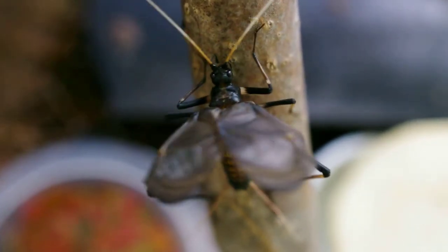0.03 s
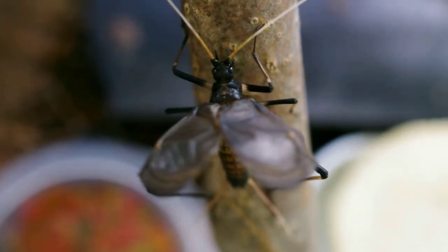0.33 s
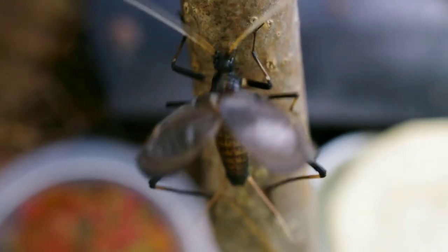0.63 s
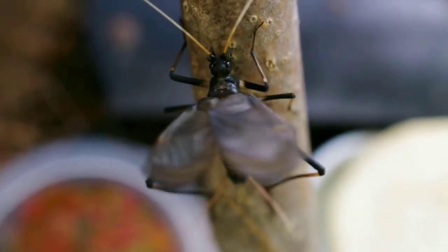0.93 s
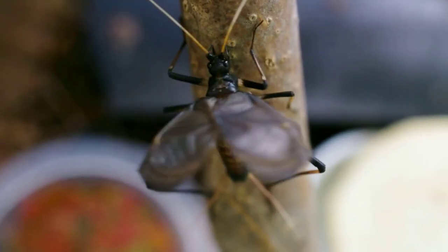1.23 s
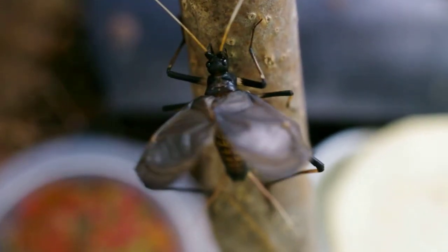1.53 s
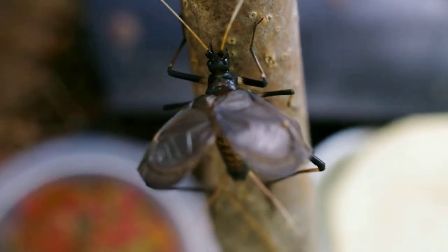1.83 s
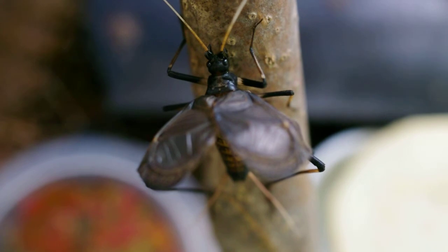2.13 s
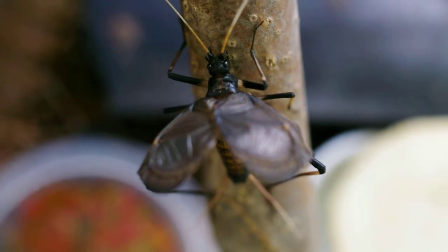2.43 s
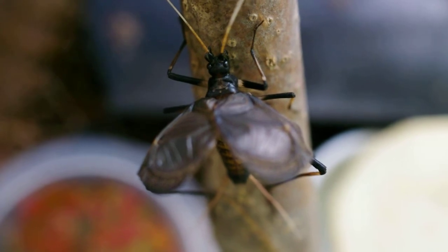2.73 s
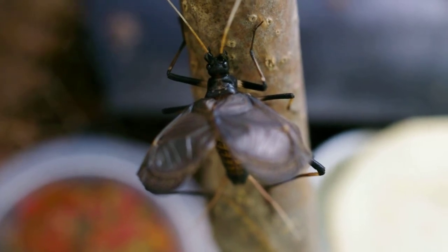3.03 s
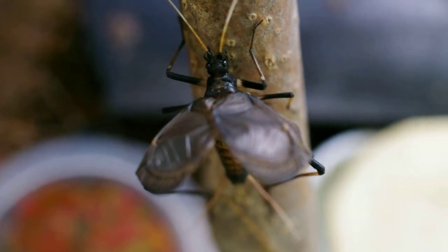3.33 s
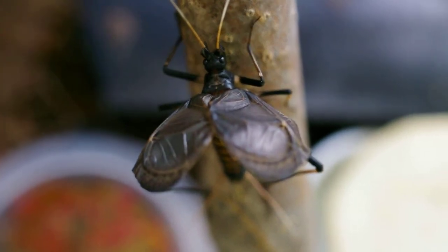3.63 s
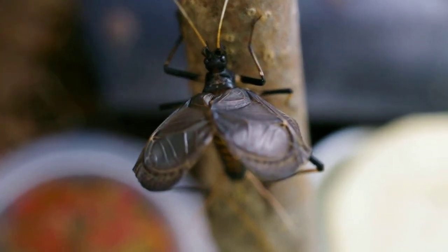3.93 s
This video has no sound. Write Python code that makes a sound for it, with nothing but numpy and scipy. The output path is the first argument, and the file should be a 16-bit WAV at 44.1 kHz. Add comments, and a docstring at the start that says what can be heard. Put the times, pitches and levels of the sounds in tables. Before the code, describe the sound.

A cricket trills close by indoors, while a fainter, higher cricket calls from farther off.

```python
"""A bell cricket trills close by, indoors; a second one, a little higher, joins from farther off.
Each wing stroke drags a scraper over a file: the wing rings near 5 kHz with faint overtones
and a dry rasp. The near one stops first; the far one slows, its strokes break in two,
and only the room's steady rush is left."""
import sys
import numpy as np
from scipy import signal
from scipy.fft import rfft, irfft
from scipy.io import wavfile

SR = 44100
rng = np.random.default_rng(int(sys.argv[2]) if len(sys.argv) > 2 else 0)


def output_pcm(signal):
    """Save a mono or channel-first signal as 16-bit PCM at the path in sys.argv[1].

    Samples are clipped to [-1, 1] before scaling.
    """
    pcm = np.clip(np.atleast_2d(signal).T, -1, 1) * 32767
    wavfile.write(sys.argv[1], SR, np.round(pcm).astype(np.int16))


N = 176400
T = np.arange(N) / SR

# Rasp spectrum of the near file. Each row: frequency in Hz, relative density in dB.
NEAR_FILE_SPECTRUM = [(2500, -24), (3800, -8.5), (4350, 0), (4600, 9), (5600, 7), (6600, -5), (7800, 0),
                      (8400, -6), (9050, -6.5), (9450, 4.5), (10200, 0.5), (10700, -19), (11400, 1.5),
                      (13000, -5.5), (14000, 3), (15600, -9)]


def near_cricket():
    """Scraper on file rings the wing: a fading trill, two long hard strokes, a second fading trill."""
    # Runs of even strokes. Each row: start in seconds, stroke count.
    runs = [(-.010, 36), (.670, 8), (.825, 6), (.947, 2), (1.028, 28), (1.579, 5)]
    # Stroke force. Each row: time in seconds, mid-stroke level in dB.
    levels = [(0, -17.5), (.15, -19.5), (.2, -21.5), (.4, -26.5), (.9, -30), (.935, -24.5), (.965, -16.5),
              (.995, -14), (1.02, -15), (1.11, -16.5), (1.28, -18), (1.35, -22.5), (1.48, -26),
              (1.68, -28.5)]
    soft_hz, soft_db, sag_hz_per_db, sag_lag_s = 5064, -26.5, 2.5, .02
    number, place, length_s = strokes(runs, stop_s=1.689)
    level_db = curve(levels)
    effort_db = np.maximum(level_db - soft_db, 0)
    pitch_hz = soft_hz - sag_hz_per_db * np.interp(T - sag_lag_s, T, effort_db)  # harder is lower
    force = undb(level_db + .8 * per_stroke(number))
    ring = wing(pitch_hz, number, place, glide_hz=50, surge_hz=21.7, scatter_hz=14, jitter_hz=16.6,
                second_db=-28 - .48 * effort_db, third_db=-27.5, drag_db=4.5, blur_rad=.36)
    envelope = stroke_envelope(place, length_s, closing_share=.88, attack_s=.006, release_s=.0065,
                               swell_db=9 - .4 * effort_db)
    scrape = rasp(NEAR_FILE_SPECTRUM, number, place,
                  bite_at=.085, bite_width=.85, scatter_db=2.5, grain_db=3.7)
    scrape_db = -53.5 + .4 * (level_db - soft_db)
    return in_room(force * envelope * ring + undb(scrape_db) * scrape, wet_db=-21)


def scratches():
    """The near scraper catches now and then with a short scratch."""
    # Each row: centre in seconds, level in dB.
    catches = [(.842, -53.5), (.969, -48), (1.032, -46.5), (1.149, -41.5), (1.324, -44), (1.618, -45),
               (1.669, -50)]
    envelope = sum(undb(db) * bump(T, at_s, width=.004) for at_s, db in catches)
    return in_room(envelope * noise(NEAR_FILE_SPECTRUM), wet_db=-13.5)


def far_cricket():
    """Two fainter, higher trills; as the wings slow, a skip splits each stroke into two blips."""
    # Runs of even strokes. Each row: start in seconds, stroke count.
    runs = [(.17, 57), (1.344, 18), (1.711, 28), (2.282, 10), (2.489, 9), (2.695, 2), (2.747, 2)]
    # Stroke force. Each row: time in seconds, level in dB.
    levels = [(.17, -37), (.27, -33), (.55, -37.5), (.95, -40), (1.05, -52), (1.3, -44), (1.41, -31.5),
              (1.48, -41), (1.56, -34.5), (1.74, -35.5), (1.92, -41.5), (2.3, -43.5), (2.8, -43.5)]
    # The tiring scraper loses the file in mid-stroke. Each row: time in seconds, depth from 0 to 1.
    skip_depths = [(1.75, 0.06), (2.2, 0), (2.45, 0.87), (2.8, 1)]
    # Rasp of the file. Each row: frequency in Hz, relative density in dB.
    file_spectrum = [(3000, -18.5), (5000, 5.5), (5700, 0.5), (6600, -6), (7300, 2.5), (8000, -16),
                     (8800, -4.5), (9600, -14), (11100, -2), (13000, -10), (15600, -4)]
    # Soft scuffing as the strokes break up. Each row: frequency in Hz, relative density in dB.
    scuff_spectrum = [(3500, -17), (4300, -4), (5100, -1), (6000, -13), (9000, -40)]
    skip_at_s, skip_width_s, closing_s = .0086, .0025, .019
    wing_hz, slip_hz = 5415, 108.6  # the freed wing runs ahead during a skip
    number, place, length_s = strokes(runs, stop_s=2.81)
    level_db = curve(levels) + .98 * per_stroke(number)
    skip = curve(skip_depths) * bump(place * length_s, skip_at_s, skip_width_s)
    ring = wing(wing_hz + slip_hz * skip, number, place, glide_hz=84, surge_hz=20, scatter_hz=9.26,
                jitter_hz=36.2, second_db=-20.5 - 15 * place, third_db=-36, drag_db=2, blur_rad=.6)
    envelope = stroke_envelope(place, length_s, closing_share=closing_s / length_s,
                               attack_s=.0035, release_s=.0048, swell_db=2)
    tone = undb(level_db) * (1 - skip) * envelope * ring
    scrape = rasp(file_spectrum, number, place, bite_at=.11, bite_width=.3, scatter_db=2.2, grain_db=1.2)
    scrape *= undb(-37 + .5 * level_db)
    scuff = rasp(scuff_spectrum, number, place, bite_at=.5, bite_width=.25, scatter_db=6, grain_db=-1)
    scuff *= undb(-60.5) * bump(T, centre=2.43, width=.14)
    return in_room(tone + scrape + scuff, wet_db=-10)


def wing(hz, number, place, glide_hz, surge_hz, scatter_hz, jitter_hz,
         second_db, third_db, drag_db, blur_rad):
    """Ringing wing: pitch falls through a stroke and dips, overtones brighter, where the scraper drags."""
    surge_share = .39  # of a cycle: the scraper speeds up and drags twice a stroke
    surge = np.cos(2 * np.pi * (place - .5) / surge_share + np.pi / 4)
    hz = hz - glide_hz * (place - .5) + surge_hz * surge
    hz = hz + scatter_hz * per_stroke(number) + jitter_hz * wander(650)  # uneven teeth
    phase = 2 * np.pi * np.cumsum(hz) / SR
    overtones = sum(undb(db) * np.sin(k * phase + blur_rad * wander(325))
                    for k, db in ((2, second_db), (3, third_db)))
    return np.sin(phase) + undb(-drag_db * surge) * overtones


def rasp(colour, number, place, bite_at, bite_width, scatter_db, grain_db):
    """Gritty scraping, strongest where the scraper bites the file; each stroke has its own colour."""
    # Edges in Hz of the bands whose levels vary by stroke.
    edges_hz = [0, 6500, 9000, 12000, 14500, 22050]
    bite = bump(place, bite_at, bite_width) * (place > 0)
    spectrum, hz = rfft(noise(colour)), np.fft.rfftfreq(N, 1 / SR)
    bands = sum(irfft(spectrum * (hz >= lo) * (hz < hi), N) * undb(scatter_db * per_stroke(number))
                for lo, hi in zip(edges_hz, edges_hz[1:]))
    return bands * bite * undb(grain_db * wander(650))  # uneven teeth


def strokes(runs, stop_s):
    """Per sample: stroke number, place 0-1 in its cycle, cycle length in seconds."""
    starts_s, counts = np.array(runs).T
    edges_s = np.append(starts_s, stop_s)
    cycle = np.interp(T, edges_s, np.append(0, np.cumsum(counts)))
    run = np.clip(np.searchsorted(edges_s, T) - 1, 0, len(runs) - 1)
    return cycle.astype(int), cycle % 1, (np.diff(edges_s) / counts)[run]


def stroke_envelope(place, length_s, closing_share, attack_s, release_s, swell_db):
    """The closing stroke rises, swells and falls away; a light opening stroke follows."""
    closing = ramp(place * length_s / attack_s) * ramp((closing_share - place) * length_s / release_s)
    opening = ramp((place - .5) * 10) * ramp((1 - place) * 10)
    return closing * undb(swell_db * (place - .5)) + undb(-19) * opening * (1 - closing)


def in_room(x, wet_db, t60_s=.16, first_echo_s=.004):
    """Direct sound plus a short tail from nearby surfaces."""
    t = T[:SR // 2]
    tail = rng.standard_normal(len(t)) * np.exp(-np.log(1000) * t / t60_s) * (t > first_echo_s)
    return x + undb(wet_db) * signal.fftconvolve(x, tail / np.linalg.norm(tail))[:N]


def room_tone():
    """Soft, even rush of indoor air."""
    # Each row: frequency in Hz, relative density in dB.
    air_spectrum = [(15, -73), (25, -46), (69, -14), (101, -10), (227, -1.5), (322, -3.5), (421, -3),
                    (598, -5.5), (703, -6.5), (919, -7), (1200, -10.5), (2420, -14.5), (5280, -20.5),
                    (14300, -27.5), (15500, -29)]
    return noise(air_spectrum) * undb(-55 + .1 * wander(4.1))


def noise(colour):
    """Unit-rms noise shaped by (Hz, dB) rows."""
    hz, db = np.array(colour).T
    bins_hz = np.maximum(np.fft.rfftfreq(N, 1 / SR), 1)
    gain = undb(np.interp(np.log(bins_hz), np.log(hz), db)) * np.minimum(bins_hz / hz[0], 1) ** 2
    x = irfft(rfft(rng.standard_normal(N)) * gain, N)
    return x / x.std()


def wander(corner_hz):
    """Smooth random motion of unit spread."""
    hz = np.fft.rfftfreq(N, 1 / SR)
    x = irfft(rfft(rng.standard_normal(N)) / (1 + (hz / corner_hz) ** 2), N)
    return x / x.std()


def per_stroke(number):
    """One normal draw held over each stroke."""
    return rng.standard_normal(N)[number]


def curve(rows):
    """Straight lines through (s, value) rows."""
    return np.interp(T, *np.array(rows).T)


def bump(x, centre, width):
    """Gaussian of height 1."""
    return np.exp(-((x - centre) / width) ** 2)


def ramp(x):
    """Smooth rise from 0 to 1."""
    return np.sin(np.pi / 2 * np.clip(x, 0, 1)) ** 2


def undb(db):
    """Decibels to gain."""
    return 10 ** (np.asarray(db) / 20)


def scene():
    """Both crickets over the room tone, mono."""
    return (near_cricket() + scratches() + far_cricket() + room_tone())[None]


def record(dry):
    """Steep low-pass on the top treble."""
    cutoff_hz = 15800
    return signal.sosfilt(signal.ellip(10, .2, 80, cutoff_hz, fs=SR, output="sos"), dry)


dry = scene()
out = record(dry)
output_pcm(out)
```